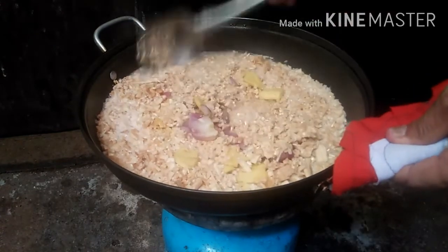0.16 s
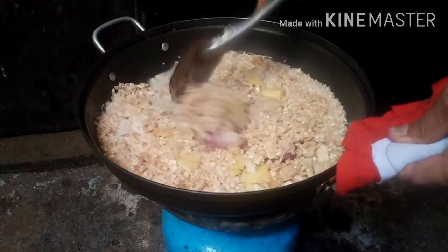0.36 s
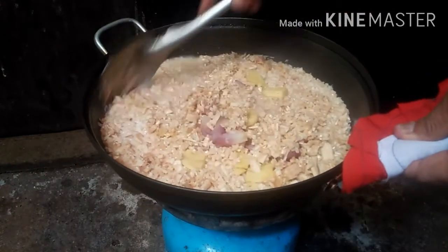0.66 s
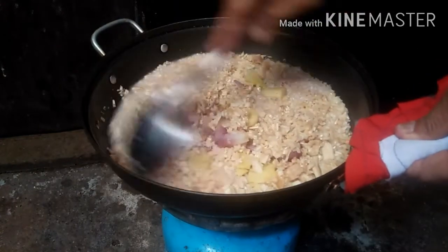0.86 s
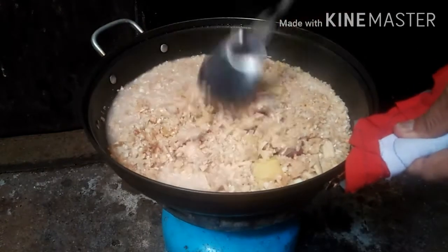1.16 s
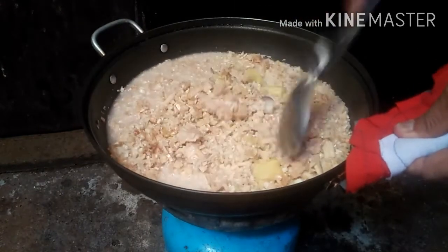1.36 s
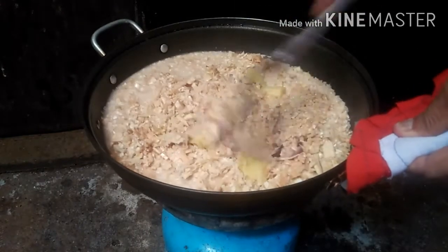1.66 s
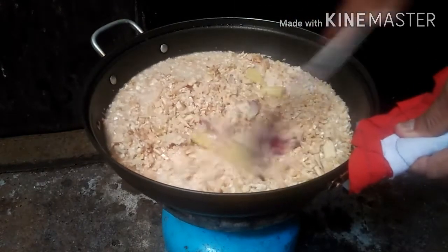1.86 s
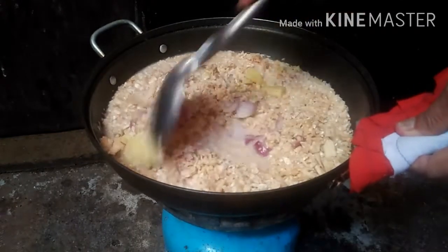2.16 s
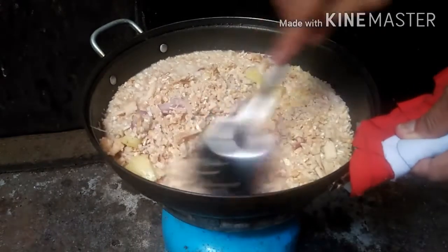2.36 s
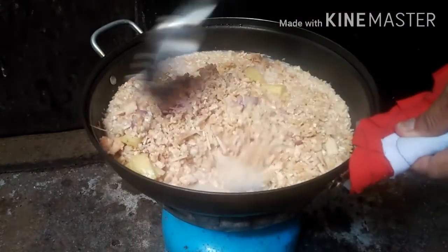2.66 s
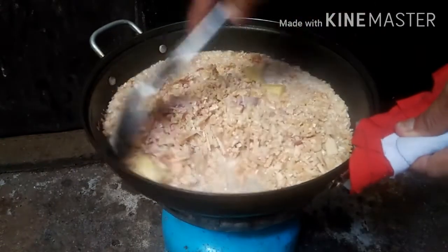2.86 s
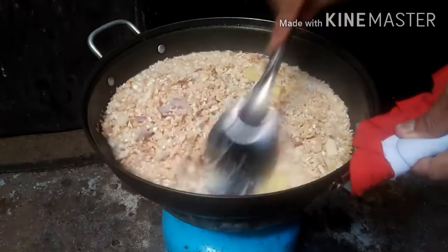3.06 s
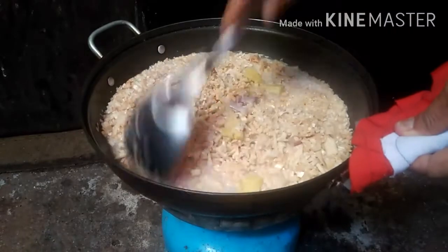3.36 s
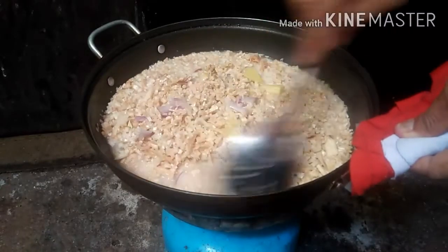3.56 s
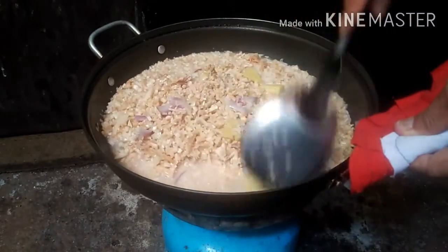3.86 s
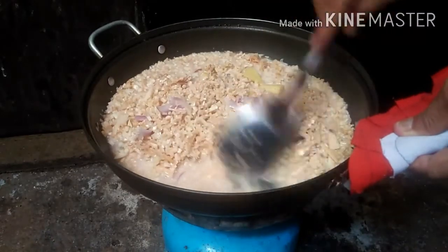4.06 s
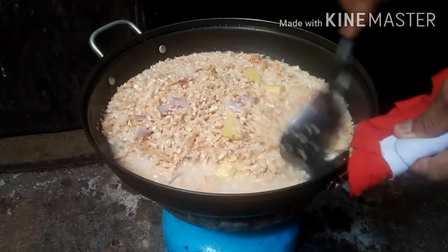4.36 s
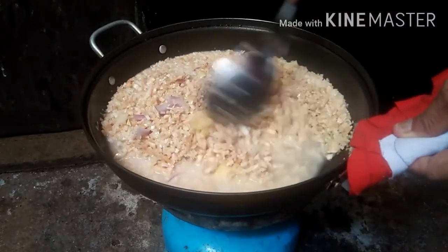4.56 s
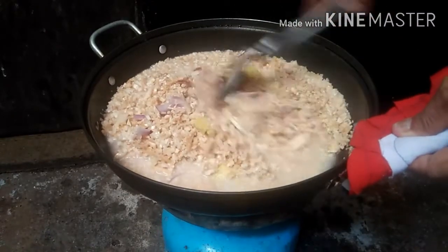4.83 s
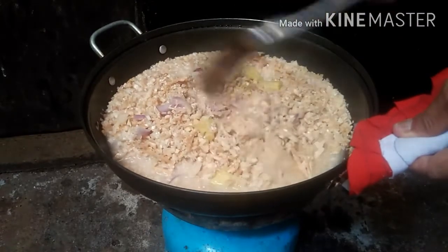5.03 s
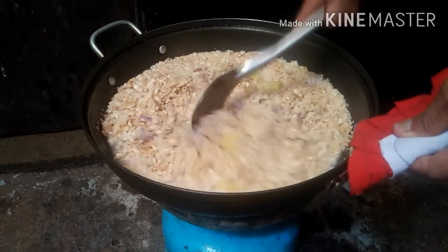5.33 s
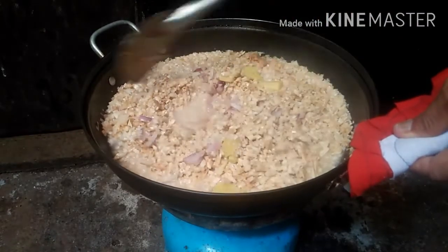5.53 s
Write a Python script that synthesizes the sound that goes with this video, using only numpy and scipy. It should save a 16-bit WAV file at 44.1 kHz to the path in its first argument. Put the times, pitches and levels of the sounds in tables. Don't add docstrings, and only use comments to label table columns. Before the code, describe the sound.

Wet grain is turned in a wide iron pan about a metre from a phone microphone. Faint hiss, flame flutter and pan hum run throughout. A dull knock and a loud rim clank come first, then uneven metal strikes and grinding slides with a short room tail. The stirring stops, leaving sizzle, a distant engine hum and faint crockery.

```python
import sys
import numpy as np
from scipy import signal
from scipy.fft import rfft, irfft
from scipy.io import wavfile
from scipy.ndimage import uniform_filter1d, map_coordinates

SR = 44100
rng = np.random.default_rng(int(sys.argv[2]) if len(sys.argv) > 2 else 0)


def to_linear_factor(level_db):
    exponent = np.asarray(level_db, float) / 20
    return 10 ** exponent


def unload_wav(signal):
    wavfile.write(
        sys.argv[1],
        SR,
        np.round(np.clip(np.atleast_2d(signal).T, -1, 1) * 32767).astype(np.int16),
    )


N = 250929
T = np.arange(N) / SR
SIZE = 9 * 2 ** 15
STROKE = 2 ** 14
HZ = np.maximum(np.fft.rfftfreq(SIZE, 1 / SR), 1)
NEAR = HZ[::18]


def colour(points, grid=HZ):
    hz, db = np.transpose(points)
    log_gain = np.interp(np.log(grid), np.log(hz), db) * np.log(10) / 20
    cepstrum = irfft(log_gain)
    cepstrum[1:len(grid) - 1] *= 2
    cepstrum[len(grid):] = 0
    return np.exp(rfft(cepstrum))


def ring(modes, widen, grid=HZ):
    total = 0
    for k, (hz, width, db) in enumerate(modes):
        damped_width = width * widen * (1 + hz / 6000)
        total = total + (-1) ** k * to_linear_factor(db) / (1 + 2j * (grid - hz) / damped_width)
    return total


def band(lo_hz, hi_hz, grid=HZ):
    low, high = 1j * grid / hi_hz, lo_hz / (1j * grid)
    return 1 / ((1 + low) * (1 + low + low ** 2) * (1 + high) * (1 + high + high ** 2))


def through(x, response):
    size = 2 * len(response) - 2
    return irfft(rfft(x, size) * response)[:len(x)] / np.sqrt(np.mean(abs(response) ** 2))


def walk(rate, size=N):
    k = int(SR / rate)
    steps = np.repeat(rng.standard_normal(size // k + 1), k)
    smooth = uniform_filter1d(uniform_filter1d(steps, k), k)[:size]
    return smooth / smooth.std()


def noise(flicker_db, rate):
    x = rng.standard_normal(N) * to_linear_factor(flicker_db * walk(rate))
    return x / x.std()


def held(rows):
    return to_linear_factor(np.interp(T, *np.transpose(rows)))


def swells(rows, t=T, rest_db=-150):
    swell = 0.42
    power = to_linear_factor(rest_db) ** 2
    for s, db, rise, fall in rows:
        come_up = np.clip(1 + (t - s) / rise, 0, 1) ** swell
        die_away = to_linear_factor(db - fall * np.maximum(t - s, 0))
        power = power + (come_up * die_away) ** 2
    return np.sqrt(power)


def motor():
    # t/s, f/Hz, level/dB
    engine = [(3.7, 69.7, -88), (3.774, 68.3, -52.5), (3.908, 76.2, -78), (4.378, 76.56, -58.5),
              (5.212, 76.2, -55.5), (5.458, 74.4, -64), (5.62, 76, -99)]
    # t/s, level/dB
    traffic = [(3.2, -86.5), (3.7, -73.5)]
    s, hz, db = np.transpose(engine)
    phase = 2 * np.pi * np.cumsum(np.interp(T, s, hz)) / SR
    note = np.sin(phase) + to_linear_factor(-23.5) * np.sin(2 * phase) + to_linear_factor(-56) * np.sin(3 * phase)
    present = (T >= s[0]) * np.clip((s[-1] - T) / 0.023, 0, 1)
    level = present * to_linear_factor(np.interp(T, s, db))
    road = through(noise(1.3, 48), band(120, 250)) * held(traffic)
    return np.sqrt(2) * note * level * to_linear_factor(0.78 * walk(13)) + road


def crockery():
    # f/Hz, width/Hz, level/dB
    dish_modes = [(264, 47, 2), (750, 67, -6), (986, 63, -0.5), (1165, 42, 6), (1452, 28, 12)]
    # peak t/s, level/dB, rise/s, fall/(dB/s)
    scrapes = [
        (5.375, -61.5, 0.039, 120),
        (5.506, -56.5, 0.035, 200),
    ]
    # peak t/s, level/dB, rise/s, fall/(dB/s)
    high_dish = [
        (5.53, -62.5, 0.13, 22),
    ]
    # peak t/s, level/dB, rise/s, fall/(dB/s)
    thuds = [
        (5.52, -64, .03, 90),
        (5.63, -74.5, 0.023, 61),
    ]
    high, low, mid = np.array([swells(high_dish), swells(thuds), swells(scrapes)]) * noise(3.2, 120)
    body = ring(dish_modes, 0.93) + to_linear_factor(-15.5)
    scrape = through(mid, body * band(555, 1060) ** 2)
    rub = through(high, body * band(1380, 1900) ** 2)
    return scrape + rub + through(low, body * band(110, 550) ** 2)


def murmur():
    # t/s, level/dB
    air = [(0, -66), (1.6, -69), (1.9, -67.5), (2.45, -68.5), (2.9, -69), (3.7, -67.5), (4.7, -67.5),
           (5.3, -68.5)]
    # f/Hz, level/dB
    hum_colour = [(150, 2), (302, -7), (376, -13.5), (422, -17.5), (614, -15.5), (690, -9.5), (1000, 0.5),
                  (1730, -3.5), (2680, -29), (3300, -41.5), (4290, -56.5)]
    # f/Hz, width/Hz, level/dB
    hum_modes = [(435, 37, -8.5), (606, 11, 1.5), (987, 78, -6), (1845, 13, 2), (2080, 23, 4.5),
                 (2214, 16, 3.5), (2615, 66, 5.5)]
    # low f/Hz, high f/Hz
    hum_parts = [(250, 700), (700, 1300), (1300, 2200), (2200, 3500)]
    shell = (ring(hum_modes, 0.91) + to_linear_factor(-0.5) * colour(hum_colour)) * band(270, 3300)
    parts = [through(noise(flicker_db=1.8, rate=35), shell * band(*part)) for part in hum_parts]
    return sum(parts) / 2 * held(air)


def flame():
    # f/Hz, level/dB
    flutter_tone = [(22, -20), (32, -22), (51, -3), (75, 3.5), (140, -8), (184, -12), (320, -39)]
    # peak t/s, level/dB, rise/s, fall/(dB/s)
    gusts = [(.2, -64, .03, 150), (.34, -61.5, 0.029, 152), (.5, -58, .06, 120), (.6, -57, 0.05, 125),
             (.85, -66, .06, 80), (1.06, -63, .05, 120), (1.26, -63, 0.041, 120), (1.38, -64, .03, 150),
             (1.56, -62, .03, 150), (1.665, -57, 0.04, 120), (1.85, -66, .03, 150), (1.98, -60, 0.026, 236),
             (2.12, -66, .03, 150), (2.28, -63, 0.027, 248), (2.44, -59, 0.05, 120), (2.6, -63, .06, 80),
             (2.75, -61, .04, 120), (2.98, -60, 0.046, 100), (3.15, -68, .04, 120), (3.29, -61, .03, 147.5),
             (3.42, -60, 0.034, 106), (4, -68, .1, 50), (4.6, -67, .4, 20), (5.2, -66, .4, 56)]
    return through(noise(1.1, 9), colour(flutter_tone) * band(16.1, 170)) * swells(gusts, rest_db=-77)


def jet_and_sizzle():
    # f/Hz, level/dB
    jet_tone = [(1760, -43), (3000, -15.5), (4040, -17.5), (6280, -13.5), (7650, -5), (7960, 1),
                (8450, 0.5), (11200, -2), (12500, -15.5), (13800, -9), (14500, -26.5)]
    # peak t/s, level/dB, rise/s, fall/(dB/s)
    sizzle = [(.08, -61.5, 0.082, 30), (.46, -64, 0.24, 15.5), (.73, -67, 0.051, 29),
              (1.05, -66.5, 0.1, 86), (1.25, -66, 0.035, 75), (1.62, -63.5, 0.1, 5), (2.1, -62.5, .1, 24),
              (2.7, -65.5, .1, 67), (3.1, -62.5, .06, 34), (3.4, -65, 0.3, 62), (3.9, -62, 0.11, 99),
              (4.3, -64.5, .1, 45), (4.75, -66.5, 0.13, 47.5), (5.01, -71.5, 0.059, 92),
              (5.16, -70, 0.085, 57), (5.46, -67, 0.13, 62)]
    return through(noise(1.0, 21), colour(jet_tone) * band(2800, 21000)) * swells(sizzle, rest_db=-77)


def ticks():
    # t/s, level/dB, f/Hz, ring/ms
    pops = [
        (.35, -55, 870, 4.6),
        (.69, -63, 3430, 2.5),
        (1.631, -34, 298, 6.8),
        (1.961, -50, 500, 5),
        (5.093, -46, 3050, 3.1),
        (5.093, -57, 2320, 7.2),
        (5.093, -58.5, 3460, 6.5),
    ]
    out, t = np.zeros(N), np.arange(SR // 20) / SR
    for s, db, hz, ring_ms in pops:
        phase = 2 * np.pi * hz * t + 0.06 * np.cumsum(rng.standard_normal(len(t)))
        shape = (1 - np.exp(-t / 0.0007)) * np.exp(-1000 * t / ring_ms)
        out[int(s * SR):int(s * SR) + len(t)] += to_linear_factor(db) * np.sin(phase) * shape
    return out


def strike(hit, response):
    rung = through(hit, response)
    return rung * np.linalg.norm(hit) / (np.linalg.norm(rung) + 1e-12)


def knocks(blows, blade_db, start):
    force, after = np.zeros((4, STROKE)), np.arange(SR // 10)
    for s, db, belly, wall, rattle_ms in blows:
        jolt = rng.standard_normal(len(after)) * np.exp(-after / SR / max(rattle_ms / 1000, 2e-4))
        at = int(s * SR) - start
        force[:, at:at + len(after)] += np.outer(to_linear_factor(db + np.array([belly, wall, blade_db, 0])), jolt)
    return force


def grind(pushes, share, grit_db, t):
    linger = [0.96, 0.63, 0.77, 0.97]
    rock_db = 2.2
    force = []
    for part_db, lean, slow in zip(share + (0,), (0.4, 0.31, 0.034, 0.14), linger):
        rows = [(s, db + part_db + lean * weight, rise, fall / slow) for s, db, rise, fall, weight in pushes]
        force.append(swells(rows, t))
    rocking = rock_db * np.array([walk(80, size=STROKE) for _ in force])
    grit = to_linear_factor(grit_db * walk(500, size=STROKE) + rocking)
    return np.array(force) * grit * rng.standard_normal((4, STROKE))


def contact(modes, blows, pushes, share, small_db, widen, grit_db, lowest_hz=120):
    # low f/Hz, high f/Hz
    metal_bands = [(250, 1300), (1300, 3000), (3000, 6500), (6500, 14500)]
    # f/Hz, level/dB
    small_modes = [(200, -31.5), (450, -14), (1000, -13), (2100, -13.5), (4800, -13.5), (6800, -9.5),
                   (8600, -2.5), (11000, -9), (14500, -23.5)]
    blow_blade_db = -11
    settle_db, settle_db_s = -29.5, 73
    smear = 1.4
    wobble_ms = 0.15
    start = max(int((pushes[0][0] - pushes[0][2] - .02) * SR), 0)
    t = T[start:start + STROKE]
    slide = grind(pushes, share, grit_db, t)
    settling = [(s, db + settle_db, rise, settle_db_s) for s, db, rise, *_ in pushes]
    slump = swells(settling, t) * rng.standard_normal(STROKE)
    knock = knocks(blows, share[2] + blow_blade_db, start)
    small = to_linear_factor(small_db) * colour(small_modes, NEAR)
    struck = ring(modes, widen, NEAR) + small
    pressed = ring(modes, smear * widen, NEAR) + small
    out, dragged = np.zeros(N), np.zeros(STROKE)
    for hit, drag, edges in zip(knock, slide, metal_bands):
        part = band(*edges, NEAR) * band(lowest_hz, SR, NEAR)
        out[start:start + STROKE] += strike(hit, struck * part)
        dragged += through(drag, pressed * part)
    bent_time = np.arange(STROKE) + wobble_ms * SR / 1000 * walk(25, size=STROKE)
    out[start:start + STROKE] += through(slump, small) + map_coordinates(dragged, [bent_time])
    return out


def pan_flank():
    # f/Hz, width/Hz, level/dB
    flank_modes = [
        [(608, 25, -6), (1130, 30, 0), (1250, 69, 0), (1410, 25, -2), (1680, 50, -1), (1950, 40, -5),
         (2240, 30, -6), (2940, 80, -18)],
        [(743, 25, -14), (1040, 24, 1), (1330, 50, -6), (1580, 48, -6), (2000, 40, -9), (2300, 50, -14),
         (2990, 100, -24), (7940, 27, -22), (9140, 71, -18)],
    ]
    # t/s, edge/dB, belly re edge/dB, wall re edge/dB, rattle/ms
    flank_blows = [
        [(2.6175, -50, 8, 9, 2), (2.6235, -43, 10, 10.5, 3), (2.6285, -42, 10, 10.5, 7)],
        [(3.2295, -50, 14, 18, 3), (3.239, -50, 22, 20, 10), (3.247, -51, 21, 19, 6)],
    ]
    # peak t/s, edge/dB, rise/s, fall/(dB/s), weight on the pan/dB
    flank_pushes = [
        [(2.62, -50.5, .004, 242, 0)],
        [(3.232, -49.5, .004, 307, 31), (3.26, -40.5, 0.019, 307, -1)],
    ]
    # small modes/dB, damping factor
    flank_load = [(-9, 1.6), (-17, 1.4)]
    shares = [(-.5, 8, -27), (-6.5, -1.4, -18)]  # belly, wall, blade, dB re edge
    strokes = zip(flank_modes, flank_blows, flank_pushes, shares, flank_load)
    return sum(contact(modes, blows, push, share, *load, grit_db=-0.5, lowest_hz=560)
               for modes, blows, push, share, load in strokes)


def pan_rim():
    # f/Hz, width/Hz, level/dB
    rim_modes = [(1470, 28, -13), (2090, 124, 1), (2770, 87, -4.5), (3850, 9.3, 7), (4410, 22, -0.5),
                 (5870, 130, 10.5), (6920, 18, 4.5), (7590, 40, -4), (9020, 340, -2.5), (9580, 45, 0),
                 (10480, 99, -3)]
    # t/s, edge/dB, belly re edge/dB, wall re edge/dB, rattle/ms
    rim_blows = [
        (1.9678, -10, -20, -5, 1.6),
    ]
    # peak t/s, edge/dB, rise/s, fall/(dB/s), weight on the pan/dB
    rim_pushes = [
        (1.97, -27.5, 0.0035, 596, 8.5),
        (1.987, -36.5, 0.013, 244.4, 2),
    ]
    share = (-12.5, -3.5, 0.16)  # belly, wall, blade, dB re edge
    return contact(rim_modes, rim_blows, rim_pushes, share, small_db=7.0, widen=1.3, grit_db=-0.5)


def pan_belly():
    # f/Hz, width/Hz, level/dB
    belly_modes = [(312, 36, -15), (533, 50, -4), (910, 55, -1), (1080, 40, -4), (1420, 50, -1),
                   (1750, 89, -2), (2060, 76, -3), (2290, 45, -3), (2560, 120, -22), (4530, 50, -17),
                   (8350, 52, -16), (8900, 87, -5.5), (9800, 54, -16)]
    # t/s, edge/dB, belly re edge/dB, wall re edge/dB, rattle/ms
    belly_blows = [
        [],
        [(1.638, -29, 15.5, 12, 1.1)],
    ]
    # peak t/s, edge/dB, rise/s, fall/(dB/s), weight on the pan/dB
    belly_pushes = [
        [(.001, -47.5, 0.0025, 320, 0.02)],
        [(1.642, -37, 0.0034, 500, 4), (1.662, -49.5, .015, 190, -8)],
    ]
    share = (1.2, 3.5, -4)  # belly, wall, blade, dB re edge
    return sum(contact(belly_modes, blows, push, share, small_db=-3.5, widen=1.2, grit_db=1.3)
               for blows, push in zip(belly_blows, belly_pushes))


def ladle():
    # f/Hz, width/Hz, level/dB
    early_modes = [
        [(425, 28, -8), (1020, 42, 0), (1910, 49, -4), (2190, 82, -6), (2500, 19, -8), (3050, 63, -9)] + [(4130, 99, -7), (4370, 52, -4), (5060, 41, -4), (5280, 33, 0), (5590, 91, -5), (6260, 44, 0)],
        [(2520, 60, 4), (4350, 40, 11), (4780, 50, 6), (5780, 58, 4)],
        [(415, 58, 1.5), (1064, 40, 10), (1150, 40, 6), (1910, 55, -1.5), (2155, 78, 8), (2300, 40, 4), (2650, 40, 0), (3504, 60, 5), (4500, 70, 4.5), (5100, 50, 4), (5500, 50, 2)],
        [(1017, 32, 12.5), (1804, 16, 8), (2340, 58, 8.5), (2710, 59, -0.5), (3110, 19, -3), (3860, 36, -0.5), (4400, 130, -6.5), (5040, 24, -1.5)],
    ]
    # f/Hz, width/Hz, level/dB
    late_modes = [
        [(1070, 46, -1), (1460, 44, -2), (1690, 23, -4), (1910, 31, 0), (2190, 38, -3)] + [(3340, 42, -2), (3500, 50, -1), (3900, 40, -6), (4310, 60, -6), (4690, 30, -4), (5230, 32, -3), (5500, 60, 0), (6060, 62, -1), (6330, 25, -4)],
        [(894, 150, 0), (1840, 38, -4), (2150, 160, -1), (3070, 72, -8), (3730, 36, -4), (4370, 29, -3), (4510, 39, -6), (4990, 37, -8), (5600, 64, -11), (5970, 110, -3)],
        [(786, 40, -6)] + [(312, 24, -15), (425, 46, -15), (1030, 98, -1), (1370, 57, -4), (1670, 68, -7), (2330, 41, 0), (2620, 44, -2), (3040, 63, -3)] + [(3550, 90, -2), (4300, 70, 0), (5010, 35, -4), (5570, 50, -2), (5900, 60, -4)],
    ]
    # f/Hz, width/Hz, level/dB
    edge_modes = [
        [(6770, 51, 0), (7800, 50, 0), (9150, 136, 8.5), (9450, 770, -0.5)],
        [(8100, 36, 2), (9800, 330, 4)],
        [(8600, 15, 4), (10200, 54, -11), (10650, 88, -10)],
        [(6470, 95, -7), (7600, 29, -3), (9050, 250, -3)],
        [(7750, 64, -2), (8000, 150, 5.5), (9830, 27, 6), (10300, 32, 5.5)],
        [(6100, 24, -10), (9020, 43, -1)],
        [(7950, 24, -1), (8150, 39, 0), (9520, 190, -5.5)],
    ]
    # t/s, edge/dB, belly re edge/dB, wall re edge/dB, rattle/ms
    ladle_blows = [
        [(2.4804, -32.5, -11, -3, 2.8), (2.5602, -48, -10.5, -24, 10), (2.568, -45, -10, -20, 20)],
        [(3.0378, -41, -20, -8, 1.9)],
        [(3.6172, -24.5, -8, -39, 1.4), (3.628, -35.5, 5, 3, 4.7), (3.692, -43, -28, -12, 6)],
        [(3.7361, -43, -27, -26, 2.5), (3.785, -47, -23, 2, 4.4)],
        [(4.1018, -23, -14, -9, 2.5), (4.113, -31, -13, -5.5, 7.9)],
        [(4.228, -48, 0, 3, 7)],
        [(4.4842, -25.5, -16, -3, 3), (4.4954, -34, -7, 1.5, 6.1), (4.533, -47, -20, 6, 3),
         (4.622, -46, 0, -20, 18)],
    ]
    # peak t/s, edge/dB, rise/s, fall/(dB/s), weight on the pan/dB
    ladle_pushes = [
        [(2.485, -38, 0.0038, 360, 0.5), (2.57, -49.5, 0.048, 132, -11), (2.622, -51, 0.074, 330, -10)],
        [(3.043, -56, 0.0044, 137, 3.5)],
        [(3.621, -35.5, .003, 230, -4.5)],
        [(3.742, -47, 0.0075, 200, -24), (3.815, -44.5, 0.059, 288, 5)],
        [(4.106, -40, 0.0026, 240, 1.5), (4.18, -48, 0.05, 402, -25)],
        [(4.225, -41.5, 0.041, 334, 1)],
        [(4.488, -34, 0.0036, 447, -11.5), (4.54, -50.5, 0.065, 120, 7.5), (4.63, -51.5, 0.13, 277, 1.5)],
    ]
    # belly, wall, blade re edge/dB
    ladle_share = [(-10.5, -10, -7.5), (-13, -10, -12.5), (-6, -10, -10), (-12, -13, -6), (-35, -6, -2.5),
                   (-16.5, -35, -9.5), (-6, -10, -4.5)]
    # small modes/dB, damping factor
    ladle_load = [(-3, 1.4), (4, 2.4), (0, 1.1), (-2, 1.2), (-4, 1.2), (-2, 1.1), (-1, 1.1)]
    strokes = zip(early_modes + late_modes, edge_modes, ladle_blows, ladle_pushes, ladle_share, ladle_load)
    return sum(contact(low + top, blows, push, share, *load, grit_db=1.0, lowest_hz=300)
               for low, top, blows, push, share, load in strokes)


def kitchen(x, low_t60, high_t60, wet_db):
    t = np.arange(SR // 2) / SR
    low, high = (rng.standard_normal(len(t)) * to_linear_factor(-60 * t / t60) * (t > .009) for t60 in (low_t60, high_t60))
    tail = rfft(low, SIZE) * band(95.5, 2700) + rfft(high, SIZE) * band(3000, 24000)
    return x + to_linear_factor(wet_db) * through(x, tail)


def scene():
    background = motor() + crockery() + murmur() + flame() + jet_and_sizzle()
    metal = pan_flank() + pan_rim() + pan_belly() + ladle()
    near = kitchen(metal + ticks(), low_t60=0.34, high_t60=0.2, wet_db=-11.0)
    return (background + near)[None]


def band_limit(x):
    return signal.sosfilt(signal.butter(12, 15560, fs=SR, output="sos"), x)


def record(dry):
    treble_limit = signal.ellip(10, .3, 26, 14350, fs=SR, output="sos")
    mix = signal.sosfilt(treble_limit, dry)
    return band_limit(mix)


dry = scene()
out = record(dry)
unload_wav(out)
```